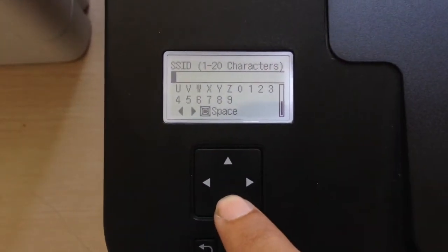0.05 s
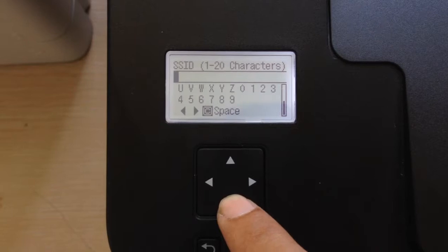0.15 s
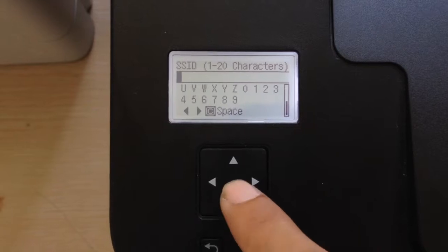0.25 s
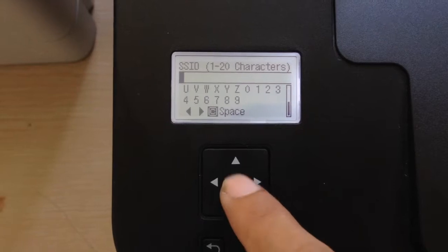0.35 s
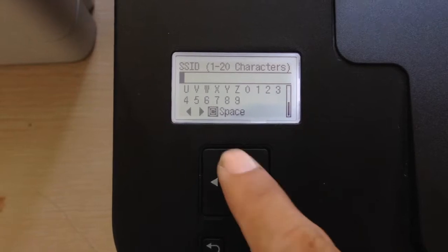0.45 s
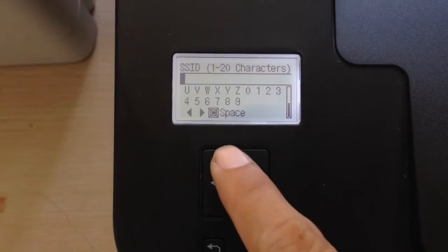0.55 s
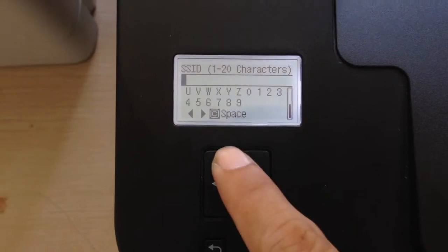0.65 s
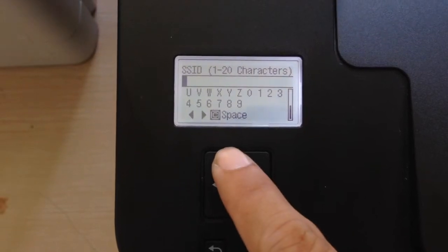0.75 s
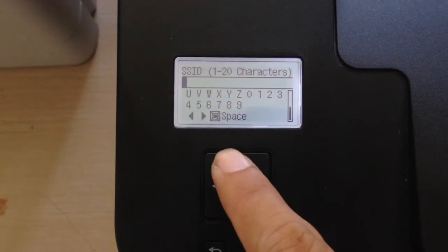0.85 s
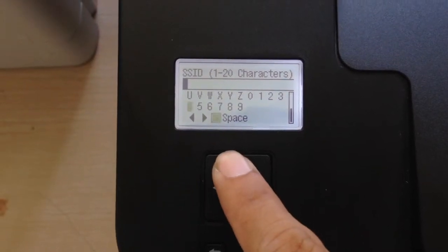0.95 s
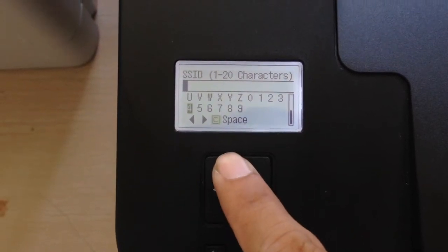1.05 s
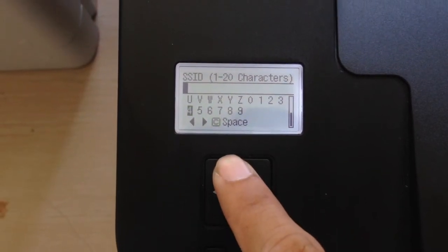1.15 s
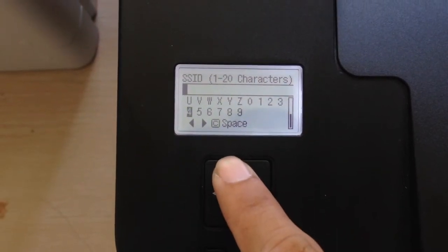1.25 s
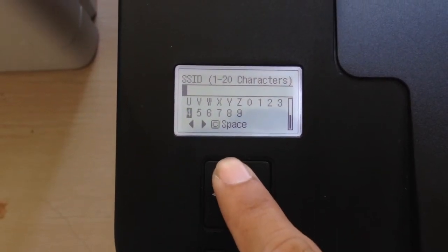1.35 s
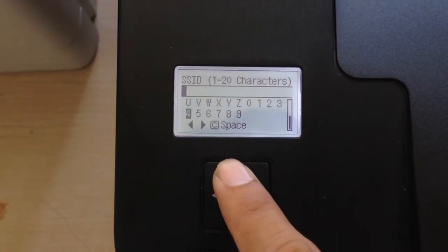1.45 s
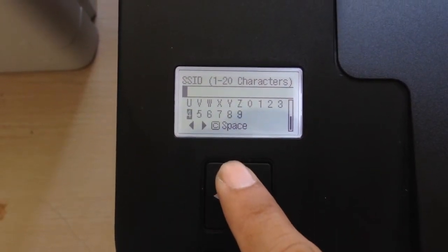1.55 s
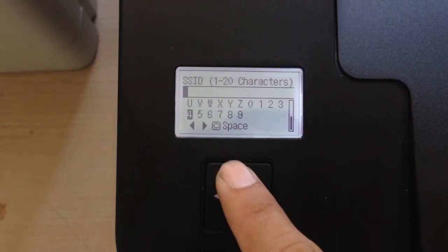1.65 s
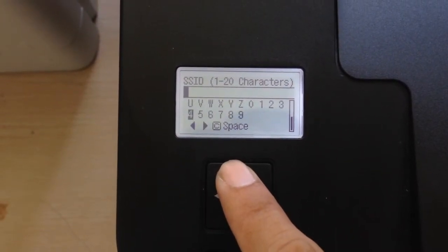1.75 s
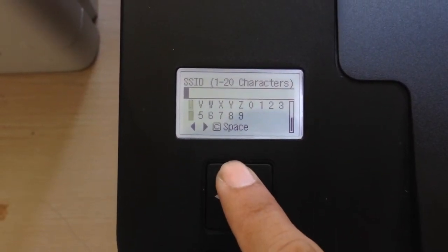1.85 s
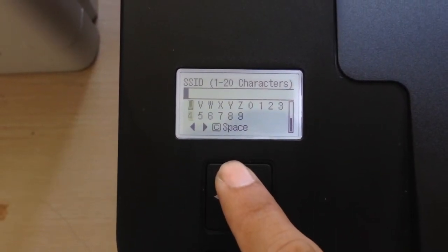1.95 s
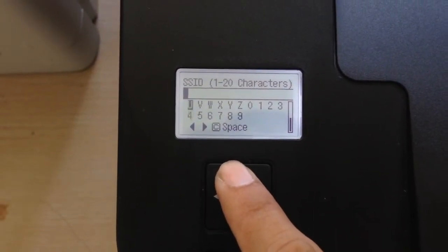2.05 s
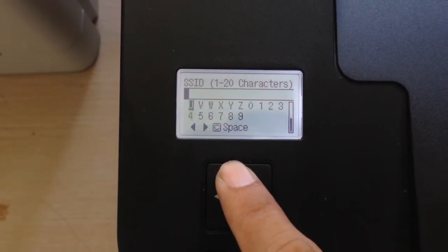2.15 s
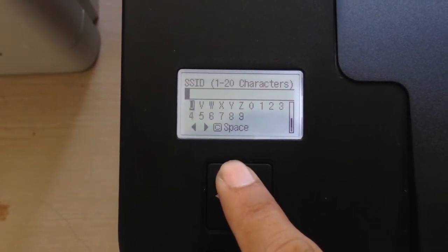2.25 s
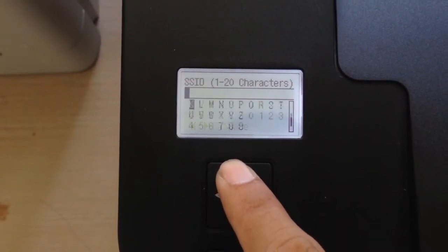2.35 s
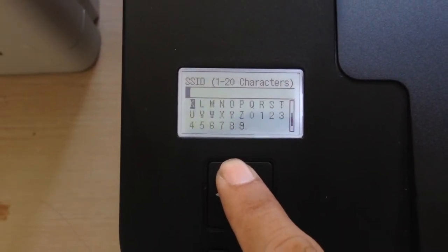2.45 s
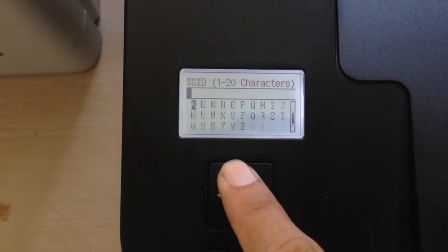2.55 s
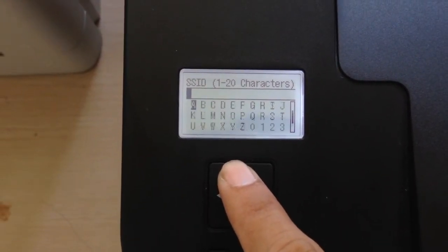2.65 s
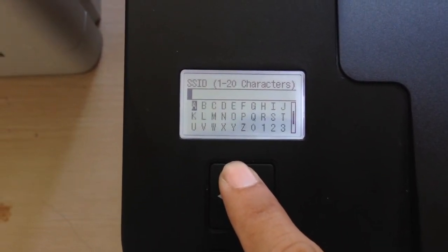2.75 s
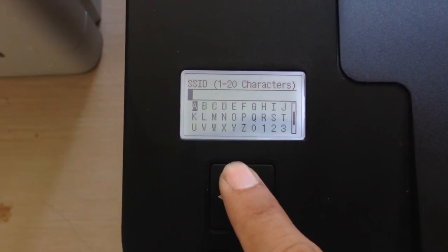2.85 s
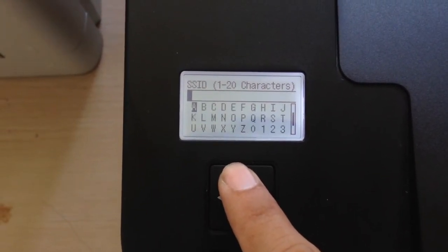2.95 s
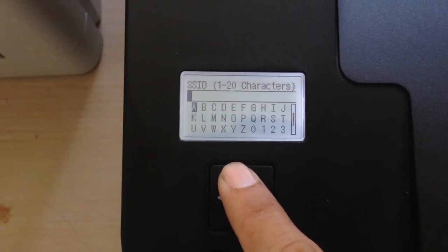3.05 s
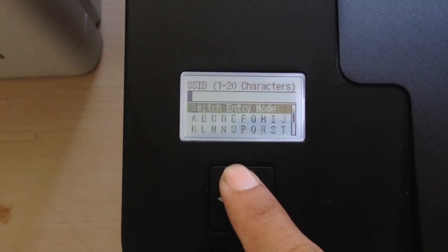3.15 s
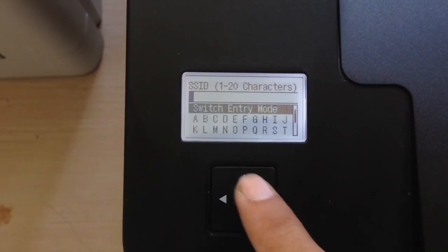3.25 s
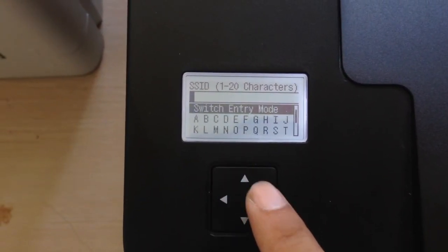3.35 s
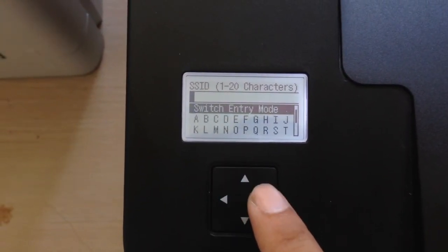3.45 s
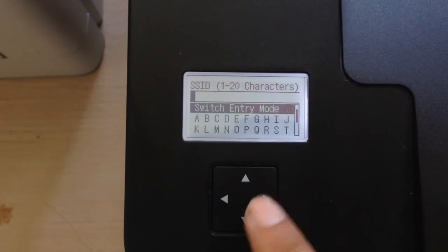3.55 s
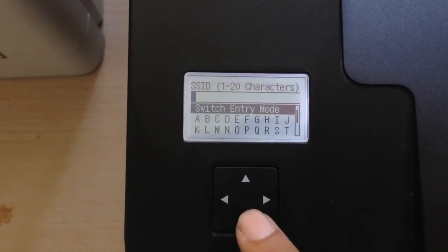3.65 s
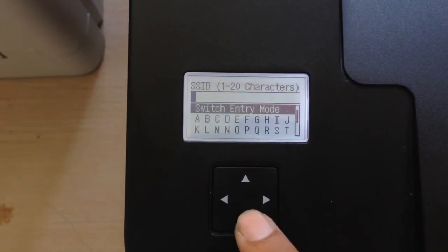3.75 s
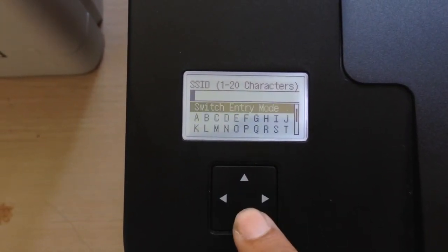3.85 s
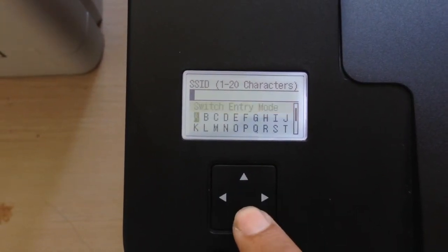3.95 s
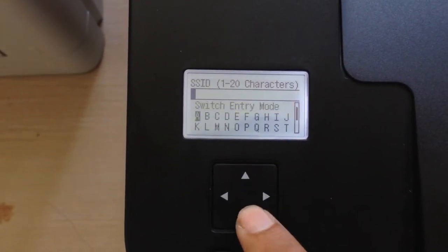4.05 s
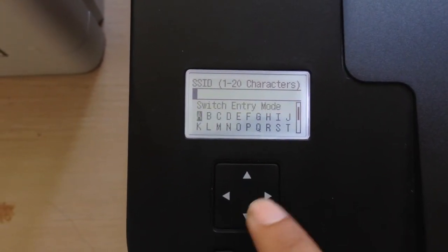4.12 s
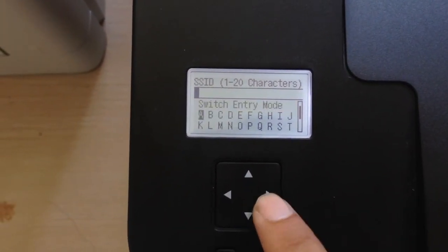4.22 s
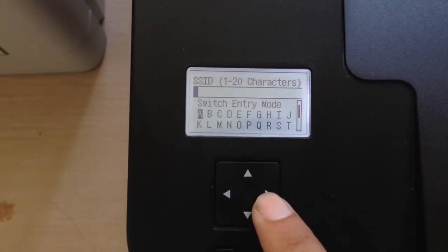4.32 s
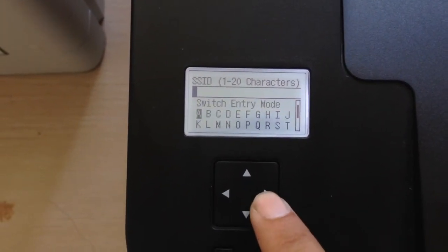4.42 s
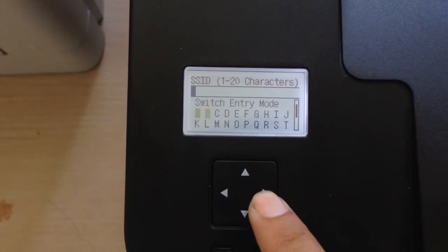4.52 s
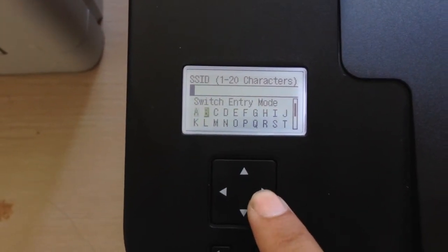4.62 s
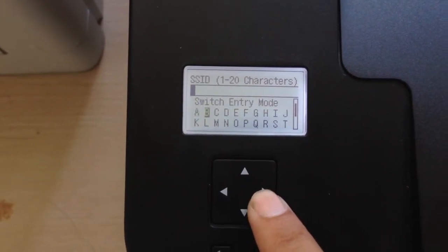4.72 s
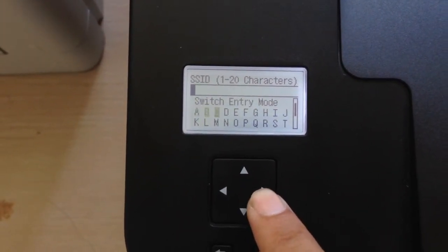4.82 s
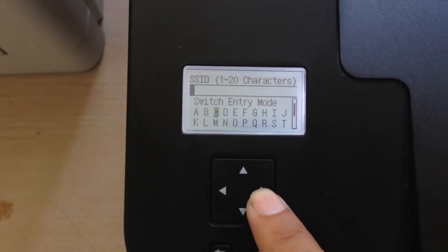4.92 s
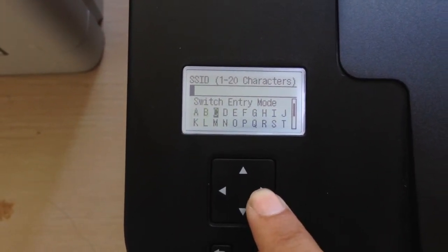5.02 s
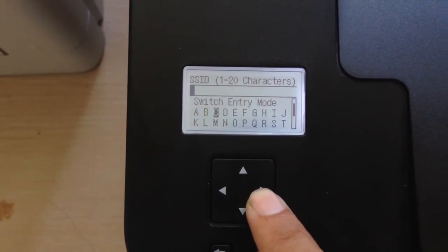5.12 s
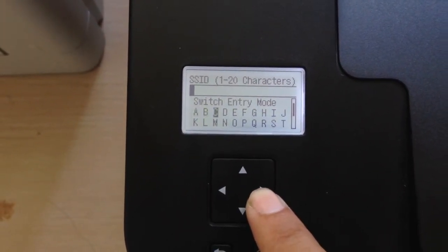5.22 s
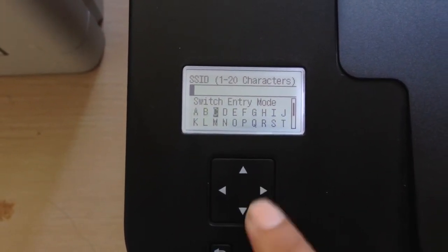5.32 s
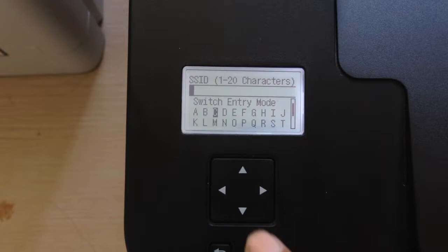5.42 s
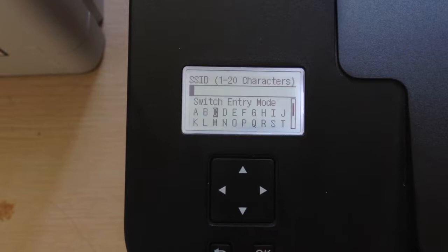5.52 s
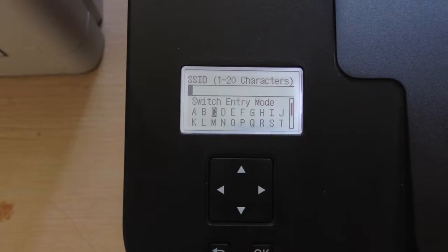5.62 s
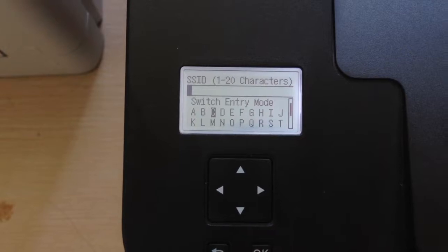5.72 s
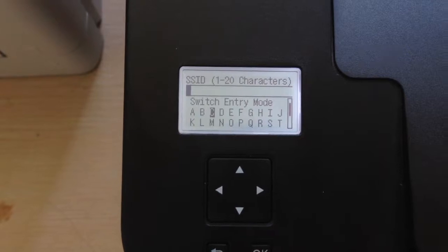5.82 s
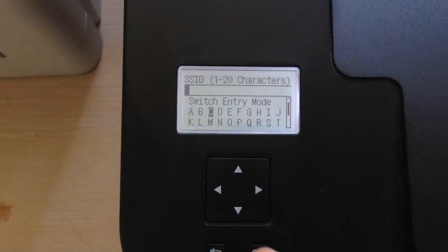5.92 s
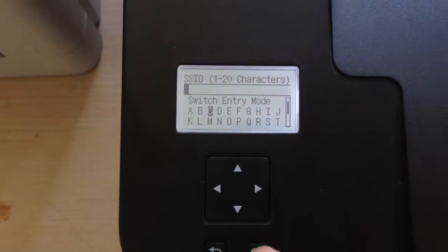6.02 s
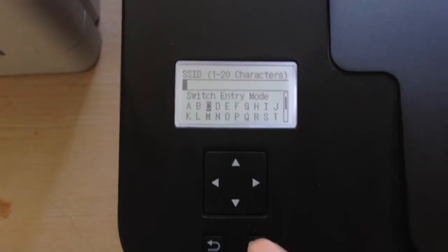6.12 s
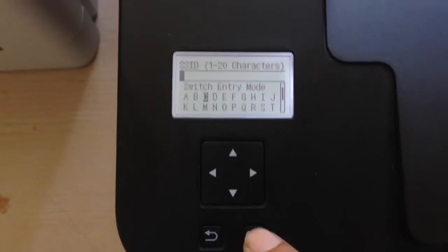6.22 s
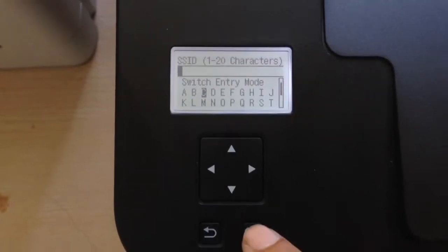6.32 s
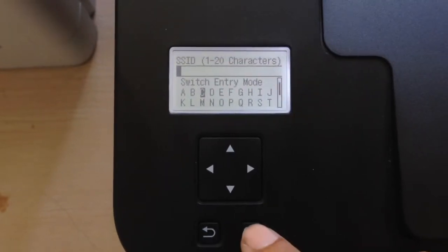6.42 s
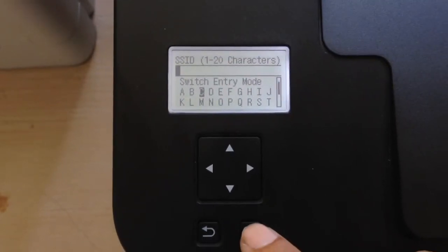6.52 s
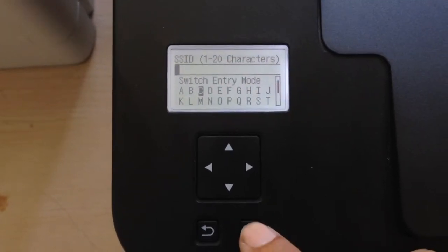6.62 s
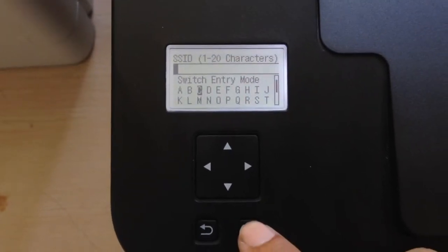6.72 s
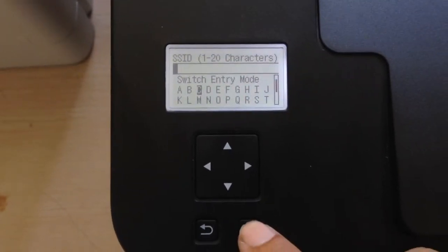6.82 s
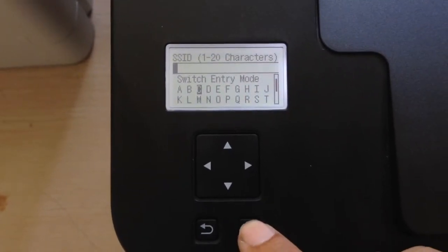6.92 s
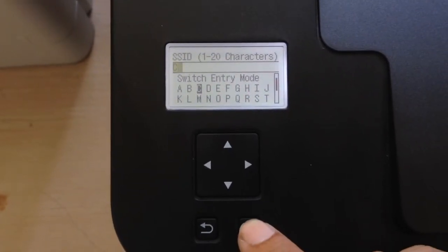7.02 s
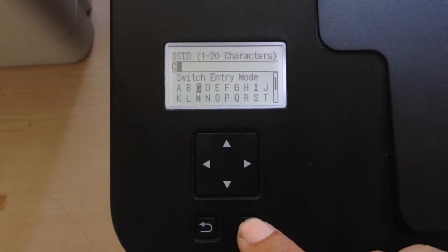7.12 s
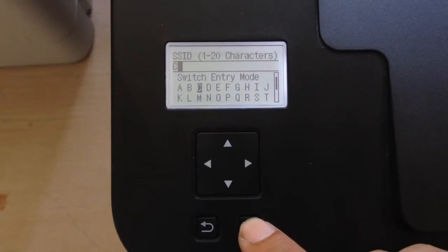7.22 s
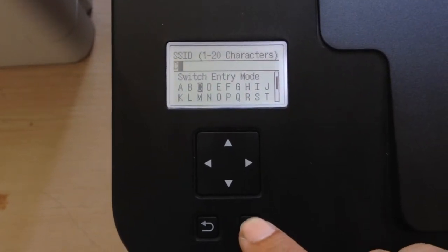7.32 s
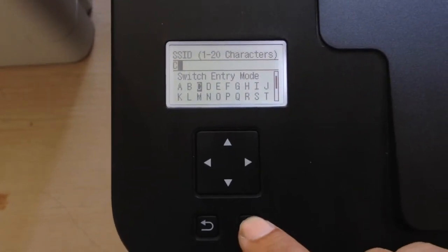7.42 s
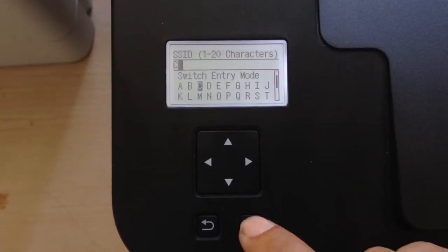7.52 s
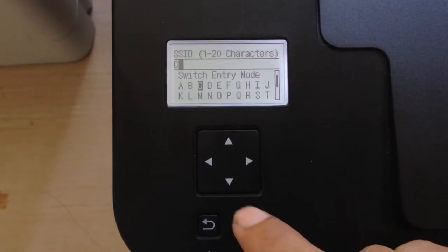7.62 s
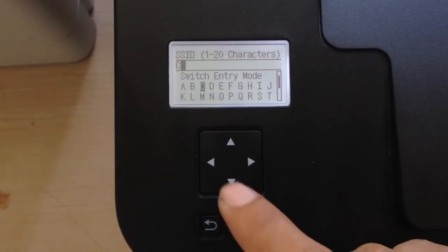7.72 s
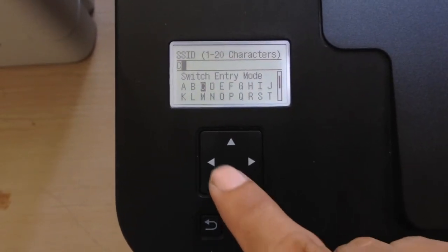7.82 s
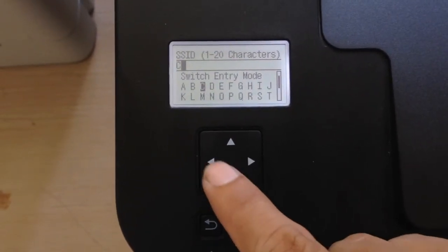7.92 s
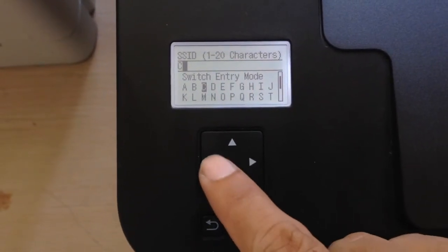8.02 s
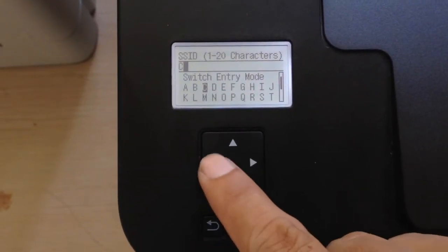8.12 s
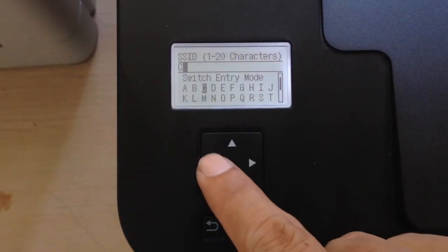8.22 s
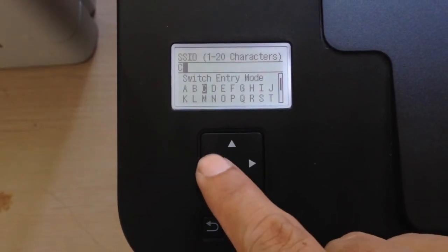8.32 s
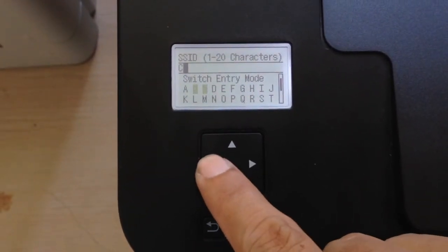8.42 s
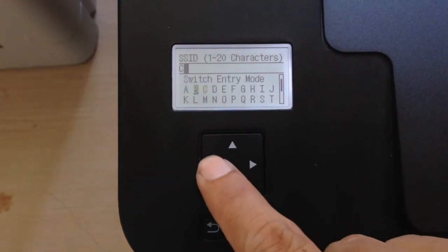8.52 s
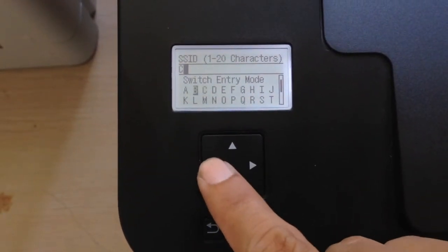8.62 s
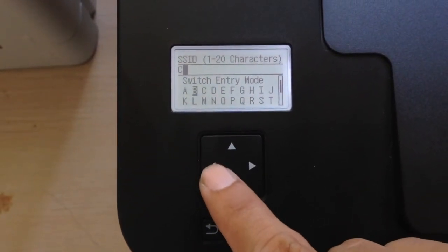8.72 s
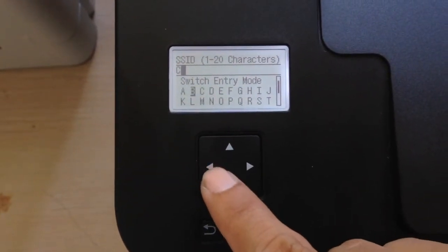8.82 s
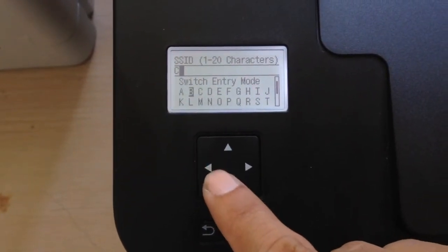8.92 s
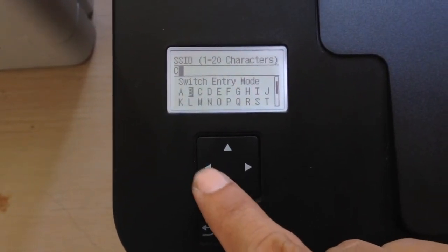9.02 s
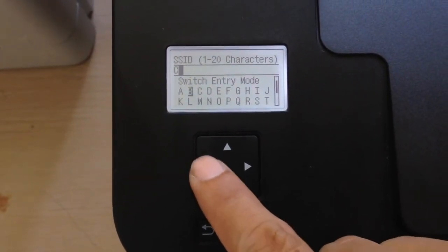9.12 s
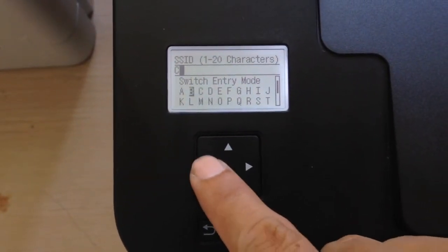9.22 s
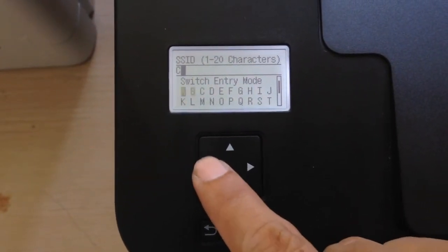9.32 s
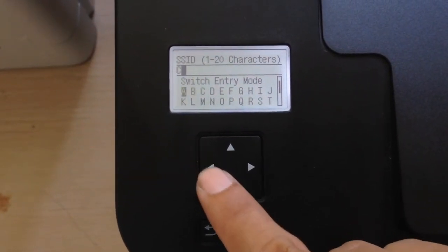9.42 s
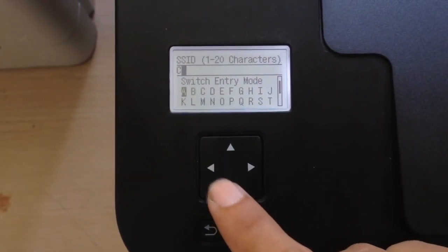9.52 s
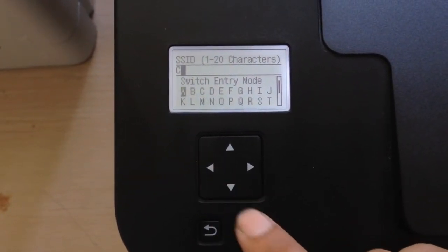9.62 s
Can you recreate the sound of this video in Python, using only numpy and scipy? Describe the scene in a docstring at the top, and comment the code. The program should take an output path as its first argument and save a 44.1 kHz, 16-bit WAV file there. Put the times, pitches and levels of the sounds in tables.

```python
"""A quiet room, where a fingertip works the plastic keys of a printer panel.
Presses snap a dome switch: a short decaying tone, answered by ringing panel modes and noise. Releases thud and
knock the housing; light touches do so faintly. When nail or skin slips off a key edge, the cap rattles and rings
high through uneven bounces; once the panel gives a creaking tick, and a cover pings hollow. Beneath lie a fan-like
hum of wavering multiples and band-shaped noise for room rumble and microphone hiss."""
import sys
import numpy as np
from scipy import signal
from scipy.io import wavfile

SR = 44100
rng = np.random.default_rng(int(sys.argv[2]) if len(sys.argv) > 2 else 0)


def to_wav(sig):
    """Store sig (one row per channel, or 1-D mono) as 16-bit WAV at the path in sys.argv[1].

    Samples outside -1..1 are clipped; the rate is SR.
    """
    pcm = np.clip(np.atleast_2d(sig), -1, 1) * 32767
    pcm = np.round(pcm).astype(np.int16)
    wavfile.write(sys.argv[1], SR, pcm.T)  # frames by channels


N = 426006
SPAN = SR // 4  # samples: a quarter of a second for each contact

# ringing of a key cap: frequency_hz, level_db, t60_s
CAP_RING = [(5990, 3, 0.037), (5970, -0.5, 0.1), (5820, -9, 0.032)]

# third-octave filters from 25 Hz up: (centre in Hz, filter)
EDGES_HZ = 25 * 2 ** (np.arange(0, 30) / 3)
BANK = [(np.sqrt(low * high), signal.butter(2, [low, high], "band", fs=SR, output="sos"))
        for low, high in zip(EDGES_HZ, EDGES_HZ[1:])]


def amp(db):
    """Decibels to amplitude."""
    return np.exp(np.asarray(db) * np.log(10) / 20)


def rms_one(x):
    """Scale a signal to an rms of 1."""
    return x / np.sqrt(np.mean(x ** 2) + 1e-20)


def at_hz(points, hz):
    """Read a curve of (Hz, value) points, straight over log frequency."""
    points_hz, values = np.transpose(points)
    return np.interp(np.log(hz), np.log(points_hz), values)


def drift(width_hz):
    """Slow chance: noise through two equal one-pole low-passes, rms 1."""
    step, run_in = 40, 2000  # samples per slow value; slow values dropped while the filter settles
    pole = np.exp(-2 * step * np.pi * width_hz / SR)
    noise = rng.standard_normal(N // step + run_in + 2)
    slow = signal.lfilter([1], [1, -2 * pole, pole * pole], noise)[run_in:]
    return np.interp(np.arange(N) / step, np.arange(len(slow)), rms_one(slow))


def bands(length, low_hz=25, shape=lambda hz: 1):
    """Third-octave noise bands, shaped in time before each filter; neighbours use unrelated draws."""
    white = rng.standard_normal((2, length))
    for k, (hz, sos) in enumerate(BANK):
        if hz > low_hz:
            yield hz, signal.sosfilt(sos, white[k % 2] * shape(hz))


def hiss(patchy_db):
    """Room rumble and microphone hiss: noise whose low bands swell and sink the most."""
    # noise spectrum before overall scaling: frequency_hz, density_db (per Hz)
    spectrum = [(25, -14.5), (50, -2.5), (100, 1.5), (160, -4.5), (250, 1), (400, -6.5), (630, -9.5),
                (1000, -16.5), (1600, -19), (3000, -19.5), (4300, -17.5), (6300, -18.5), (9000, -18),
                (12500, -16), (15500, -16)]
    # slow course of the rumble: time_s, level_shift_db
    rumble = [(0.0, 0.5), (9.66, -1.5)]
    level_db = -62.5  # rms of the sum
    swell_db = np.interp(np.arange(N) / SR, *np.transpose(rumble))
    out = np.zeros(N)
    for hz, band in bands(N):
        low_share = 1 / (1 + hz / 800)
        moving_db = (swell_db + patchy_db * drift(4.0)) * low_share
        out += band * amp(at_hz(spectrum, hz) + moving_db)
    return amp(level_db) * rms_one(out)


def hum():
    """Multiples of a slow rotation, each wavering in level and phase like narrow noise."""
    # hum partials: multiple (of the rotation), level_db (rms)
    partials = [(2, -79.5), (3, -73), (4, -81.5), (5, -79.5), (6, -76.5), (7, -77), (8, -84), (9, -90),
                (12, -84.5)]
    rotation_hz, width_hz = 44.27, 2.2
    t = np.arange(N) / SR
    out = np.zeros(N)
    for multiple, level_db in partials:
        phase = 2 * np.pi * multiple * rotation_hz * t
        out += amp(level_db) * (drift(width_hz) * np.cos(phase) + drift(width_hz) * np.sin(phase))
    return out


def hump_db(hz, centre_hz, bass_octaves, treble_octaves):
    """A contact favours a hump of pitches: 10 dB down one width away from the centre."""
    away = np.log2(hz / centre_hz)
    return np.where(away > 0, -10 * away / treble_octaves, 10 * away / bass_octaves)


def dying_noise(colour, chatter_ms, chatter_db):
    """Contact chatter, panel modes too dense to tell apart, then the room: three decays per noise band."""
    # decay of the dense panel modes: frequency_hz, t60_s
    dense_ring = [(500, 0.15), (1500, 0.15), (3500, 0.028), (7000, 0.024), (14000, 0.03)]
    # decay of the room: frequency_hz, t60_s
    room_t60 = [(500, .45), (2000, 0.2166), (3400, 0.31), (5000, 0.27), (14000, 0.17)]
    room_db = -19
    t = np.arange(SPAN) / SR
    burst = amp(chatter_db) * np.exp(-1000 * t / chatter_ms)
    walls_reached = np.clip(t / 0.0053, 0, 1)

    def decay(hz):
        dense = amp(-60 * t / at_hz(dense_ring, hz))
        room = amp(room_db - 60 * t / at_hz(room_t60, hz)) * walls_reached
        return burst + dense + room

    out, power = np.zeros(SPAN), 0
    for hz, band in bands(SPAN, low_hz=158.2, shape=decay):
        gain = amp(hump_db(hz, *colour))
        out += gain * band
        power += gain ** 2 * hz / (2 * SR)  # a band's power grows with its width
    return out / np.sqrt(power)


def modes(table):
    """One blow rings every mode, each with a strength of its own that flutters as it dies."""
    blow_spread_db = 3  # how much a mode's strength differs from blow to blow
    waver_ms, waver_share = 5, .9  # plastic parts touch loosely, so rings flutter
    hz, level_db, t60 = np.transpose(table)[:, :, None]
    t = np.arange(SPAN) / SR
    strength = amp(level_db + blow_spread_db * rng.standard_normal(hz.shape))
    knots = np.arange(0, t[-1], waver_ms / 1000)
    # no flutter at the instant of the blow
    flutter = np.array([np.interp(t, knots, (knots > 0) * rng.standard_normal(len(knots))) for _ in hz])
    rings = amp(-60 * t / t60) * np.sin(2 * np.pi * hz * t)
    return np.sum(strength * (1 + waver_share * flutter) * rings, axis=0)


def panel(ring_db, colour, chatter_ms, chatter_db, thud_db, knock_db):
    """The panel rings in the contact's colour, with a duller thud and the housing's knock."""
    # clear panel modes: frequency_hz, level_db (before trim and colour), t60_s
    panel_modes = [(1286, 2.5, .07), (1686, -2, 0.055), (2100, -8, 0.028), (2360, -7.5, 0.027),
                   (2547, -6, .1), (2620, -9, 0.065), (3007, -6, 0.067), (3300, -4.5, .11),
                   (3490, -14, 0.097), (3620, -7, .12), (3780, -8, .1), (4164, -4, 0.083), (4817, 0, 0.081),
                   (5990, -8, .07), (6070, -5, .06), (6885, -11, 0.11)]
    # housing modes: frequency_hz, level_db, t60_s
    housing_modes = [(132, -5, 0.083), (178, -3, 0.15), (248.4, -0.5, 0.138), (287.4, -3.5, .1),
                     (360, -2.5, 0.054), (503, -0.5, 0.058)]
    trim_db, skin_ms = -7, 1.5
    thud_colour = (560, 2.2, 2.2)  # centre in Hz, bass and treble widths in octaves
    t = np.arange(SPAN) / SR
    clear = [(hz, trim_db + level_db + hump_db(hz, *colour), t60) for hz, level_db, t60 in panel_modes]
    hard = amp(ring_db) * (modes(clear) + dying_noise(colour, chatter_ms, chatter_db))
    thud = amp(thud_db) * dying_noise(thud_colour, chatter_ms, chatter_db=-17.0)
    # skin is soft: the knock builds up over a moment
    knock = amp(knock_db) * modes(housing_modes) * (1 - np.exp(-1000 * t / skin_ms))
    return hard + thud + knock


def touch(ring_db, centre_hz):
    """A light contact of skin or nail on plastic: thud and knock follow its strength."""
    return panel(ring_db, colour=(centre_hz, 1.4, 1), chatter_ms=2.1, chatter_db=0.5,
                 thud_db=ring_db - 6.5, knock_db=ring_db - 4)


def echo(sound):
    """Dense room reflections: the sound smeared through dying noise of energy 1."""
    t60_s, rise_s = 0.33, .008
    t = np.arange(SPAN) / SR
    walls = rng.standard_normal(SPAN) * amp(-60 * t / t60_s) * np.clip(t / rise_s, 0, 1)
    return signal.fftconvolve(sound, walls / np.linalg.norm(walls))[:SPAN]


def switch(dome_db, dome_hz, dome_ms, cap_db):
    """The dome buckles: a brief tone with an overtone, stopped when it lands; the panel takes over."""
    rise_ms, overtone_ratio, overtone_db, echo_db = .12, 1.793, -22.5, -17.5
    ms = 1000 * np.arange(SPAN) / SR
    phase = 2 * np.pi * dome_hz * ms / 1000
    swing = (1 - np.exp(-ms / rise_ms)) * np.exp(-(ms / dome_ms) ** 2)
    dome = swing * (np.sin(phase) + amp(overtone_db) * np.sin(overtone_ratio * phase))
    snap = amp(dome_db) * (dome + amp(echo_db) * echo(dome))

    # the answer's colour lies between the panel's own pitch and the dome's
    own_hz, follows_dome = 3200, 0.57
    centre_hz = own_hz * (dome_hz / own_hz) ** follows_dome
    # the softer the press, the wider the colour reaches into the bass
    firm_press_db, octaves_per_db = -16, 0.02
    bass_octaves = 0.81 + octaves_per_db * (firm_press_db - dome_db)
    answer = panel(dome_db - 15.5, colour=(centre_hz, bass_octaves, 0.81), chatter_ms=1.1, chatter_db=5,
                   thud_db=-55, knock_db=-61)
    # part of the answer sounds at once, the rest builds up
    at_once, spread_ms = .4, 1.5
    build_up = 1 - (1 - at_once) * np.exp(-(ms / spread_ms) ** 2)
    return snap + amp(cap_db) * modes(CAP_RING) + build_up * answer


def release(ring_db, thud_db, knock_db):
    """The dome springs back: a faint ring with thud and knock."""
    return panel(ring_db, colour=(2966, 0.96, 1.0), chatter_ms=1.1, chatter_db=-5,
                 thud_db=thud_db, knock_db=knock_db)


def chatter(decay_ms):
    """A first tick, then uneven micro-bounces that die within milliseconds; energy 1."""
    t = np.arange(SR // 20) / SR
    happens = rng.random(len(t)) < .12
    bounces = 0.3 * rng.standard_normal(len(t)) ** 3 * happens * np.exp(-1000 * t / decay_ms)
    bounces[0] = 1
    return bounces / np.linalg.norm(bounces)


def slip_or_creak(cap_bounce_db, cap_db, ring_db, centre_hz, bass_octaves, treble_octaves, thud_db):
    """In a slip the freed cap bounces and rings high; in a creaking tick the panel's ring covers the cap."""
    # bouncing key cap modes: frequency_hz, level_db, t60_s
    key_cap = [(7960, -10, 0.034), (10350, 2, 0.028), (10650, 1, 0.039), (10840, -1.5, 0.035),
               (11170, -5.5, 0.035), (11270, -14, 0.021), (12500, -9, .02)]
    chatter_ms = 4
    cap_bounce = signal.fftconvolve(modes(key_cap), chatter(chatter_ms))[:SPAN]
    contact = panel(ring_db, (centre_hz, bass_octaves, treble_octaves), chatter_ms, chatter_db=-5.5,
                    thud_db=thud_db, knock_db=-57.5)
    return amp(cap_bounce_db) * cap_bounce + amp(cap_db) * modes(CAP_RING) + contact


def ping(level_db):
    """The cover rings hollow on two close modes."""
    # cover modes: frequency_hz, level_db, t60_s
    cover = [(1224, -2.5, 0.1), (1230, -16, 0.057)]
    return amp(level_db) * modes(cover)


def keys():
    """Each contact, creak and ping is added at its moment, so their tails overlap."""
    # light touches: start_s, ring_db, centre_hz
    touches = [(.3557, -63, 1700), (.669, -71, 1500), (2.1104, -49, 4500), (2.807, -61, 3360),
               (2.9224, -73, 3340), (3.3037, -58, 3080), (4.2508, -67, 2900), (5.4338, -55.5, 4200),
               (6.0248, -58, 3040), (6.9946, -62, 4500), (8.2469, -59.5, 2170), (9.1397, -68.5, 1630)]
    # dome presses: start_s, dome_db, dome_hz, dome_ms, cap_ring_db
    presses = [(.9814, -22, 3060, 0.95, -47.5), (1.8831, -18, 3130, 1.6, -48.5),
               (2.3294, -16.5, 3170, 1.76, -50.5), (2.5756, -16.5, 3100, 1.9, -44.5),
               (3.1213, -18, 3110, 1.6, -47.5), (3.6472, -28.5, 2840, 0.4, -55),
               (3.9229, -10.5, 3610, 0.93, -53), (4.5426, -16, 3330, 1.36, -52),
               (4.8149, -15.5, 3370, 1.4, -47.5), (7.0336, -23, 4800, 0.47, -67),
               (8.4634, -19.5, 3130, 1.1, -54), (9.3098, -30, 3080, 1, -71)]
    # releases: start_s, ring_db, thud_db, housing_knock_db
    releases = [(1.253, -50, -51.5, -52), (2.1035, -60, -60, -54), (2.4668, -60, -54.5, -49.5),
                (2.713, -80, -57.5, -52.5), (3.2067, -68, -53, -45.5), (4.0986, -47.5, -49.5, -50.5),
                (4.6522, -65, -53, -50), (4.949, -59.5, -61.5, -51.5), (7.2528, -64, -53, -47.5),
                (8.6567, -61.5, -57.5, -53), (9.5081, -50.5, -54, -61.5)]
    # slips off a key edge, and one creaking tick of the panel (7.7251 s): start_s, cap_bounce_db,
    # cap_ring_db, panel_ring_db, centre_hz, bass_width_octaves, treble_width_octaves, thud_db
    slips_and_creak = [(3.3228, -39, -44, -42, 3500, 2.8, 3.3, -45.5),
                       (3.3314, -46, -40, -41.5, 3500, 1.6, 2.4, -67),
                       (3.342, -40, -58, -51, 3500, 2.1, 1.5, -44.5),
                       (5.451, -57, -76, -62, 6000, 2, 1.5, -62),
                       (5.4579, -43.5, -49.5, -41, 2960, 1.14, 1.5, -43.5),
                       (7.7251, -55, -65, -27.5, 6370, 0.89, .5, -72),
                       (8.791, -47, -55, -43, 3000, 1.8, 1.2, -49.5)]
    # hollow pings of the cover: start_s, level_db
    pings = [(3.336, -49), (7.735, -42.5), (9.143, -63)]
    out = np.zeros(N + SR)
    for table, source in [(touches, touch), (presses, switch), (releases, release),
                          (slips_and_creak, slip_or_creak), (pings, ping)]:
        for start_s, *settings in table:
            start = round(start_s * SR)
            out[start:start + SPAN] += source(*settings)
    return out[:N]


def scene():
    """Hiss and hum run throughout beneath the key sounds; one channel."""
    return (hiss(patchy_db=3.0) + hum() + keys())[None]


def record(dry):
    """The small capsule lifts a hump in the treble; the top is cut steeply."""
    peak_hz, width_hz, lift_share, cutoff_hz = 11500, 1700, .5, 15800
    r, w = np.exp(-np.pi * width_hz / SR), 2 * np.pi * peak_hz / SR
    edge = (1 - r * r) / 2
    hump = signal.lfilter([edge, 0, -edge], [1, -2 * r * np.cos(w), r * r], dry)
    top_cut = signal.cheby2(14, 60, cutoff_hz, fs=SR, output="sos")  # 60 dB down from the cutoff up
    return signal.sosfilt(top_cut, dry + lift_share * hump)


dry = scene()
out = record(dry)
to_wav(out)
```